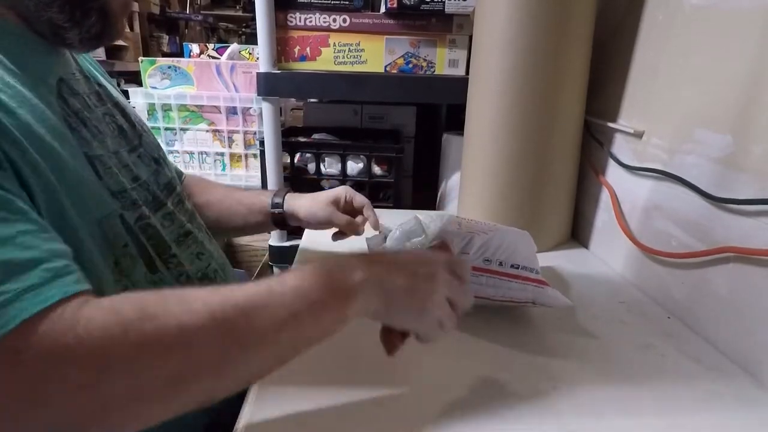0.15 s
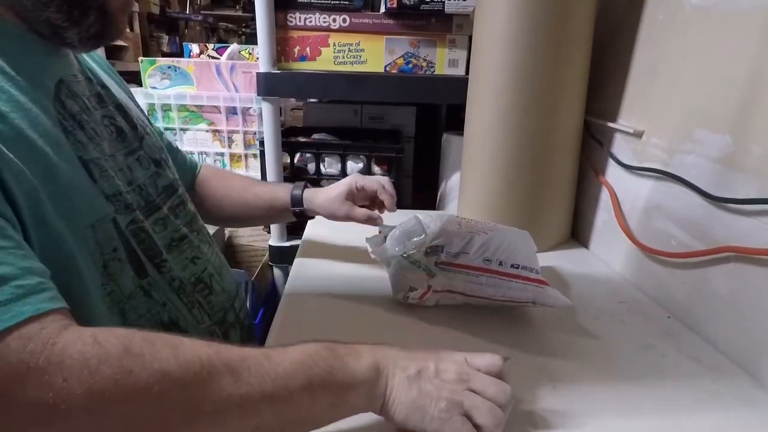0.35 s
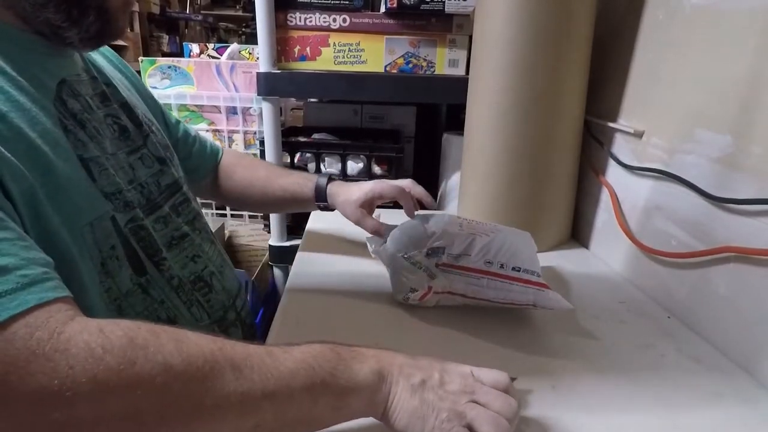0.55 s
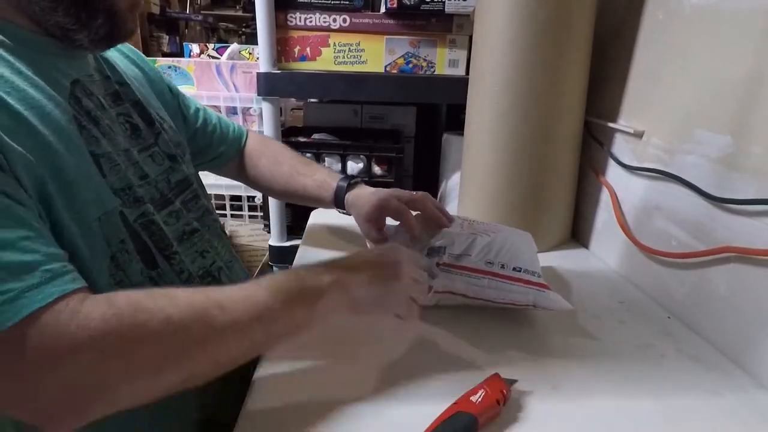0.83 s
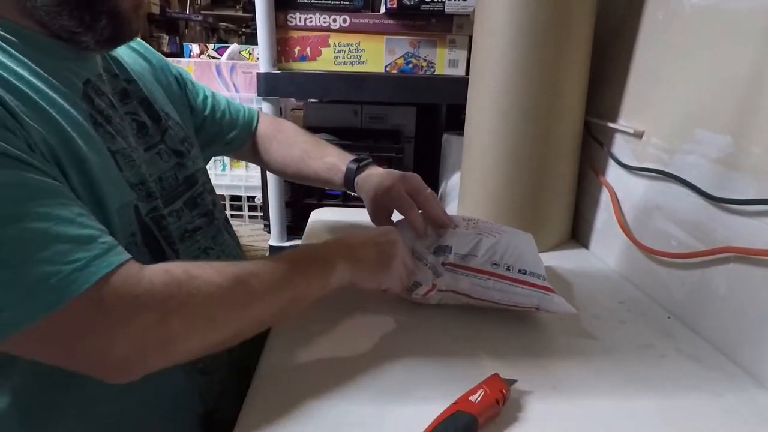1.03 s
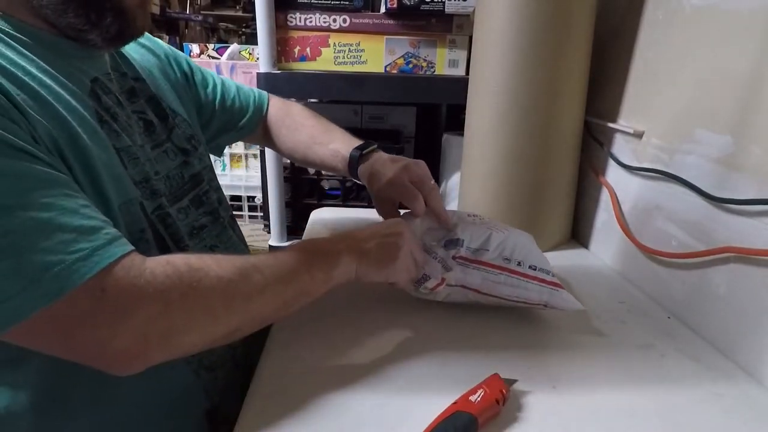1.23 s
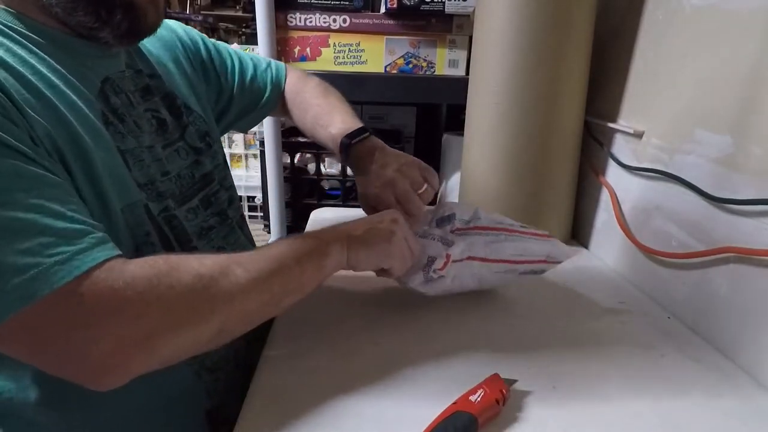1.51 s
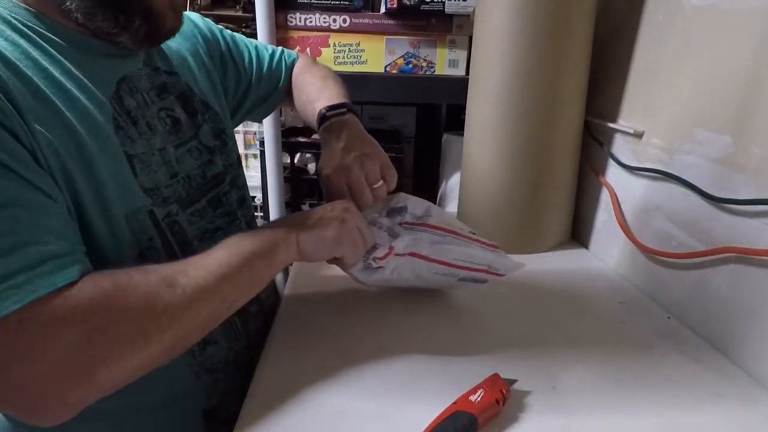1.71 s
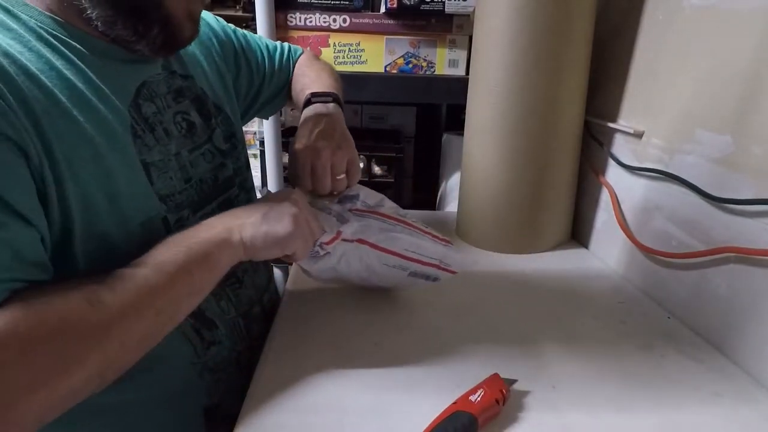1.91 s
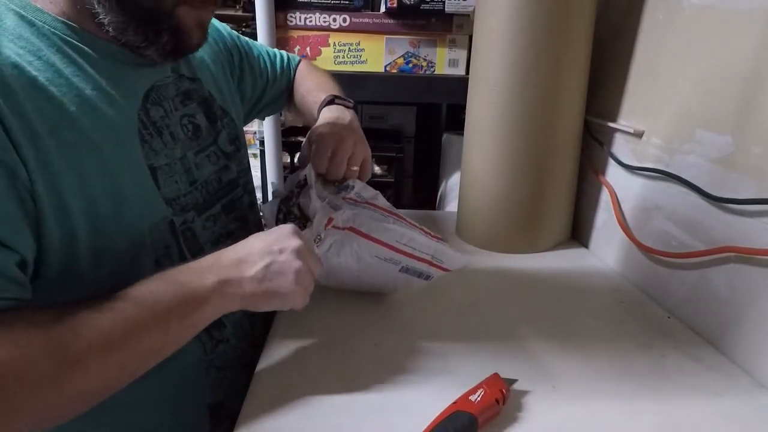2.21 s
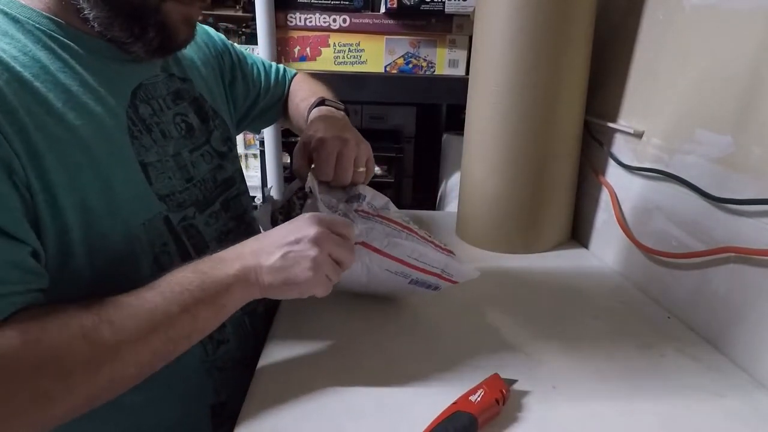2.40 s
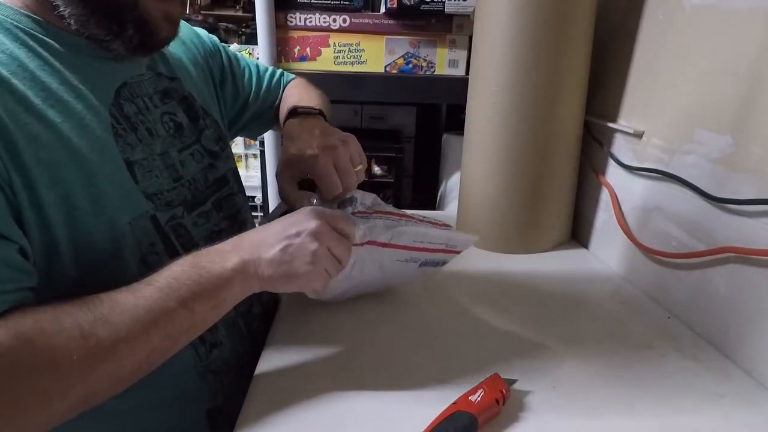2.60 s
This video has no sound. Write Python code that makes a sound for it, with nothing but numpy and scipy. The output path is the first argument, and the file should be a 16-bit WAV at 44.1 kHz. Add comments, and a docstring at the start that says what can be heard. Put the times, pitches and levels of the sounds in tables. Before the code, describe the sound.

Plastic bag rustling and crackling after dull bench thuds, then tearing open with a snap.

```python
"""A plastic mailer bag is pulled open by hand on a workbench in a small cluttered room.
A knife is set down and the bench thuds and sways; then the film is gripped and pulled.
Creases buckle in sharp crackles over a fine rustle, wide panels flip with hollow tocks and the bag
drags on the bench. The stretched plastic scrapes, rips and gives with a snap.
A low rumble and quiet room tone lie underneath."""
import sys
import numpy as np
from scipy import signal
from scipy.fft import rfft, irfft
from scipy.io import wavfile

SR = 44100
rng = np.random.default_rng(int(sys.argv[2]) if len(sys.argv) > 2 else 0)


def bounce(signal):
    """Save signal as a 16-bit WAV file at the path given by the first command-line argument."""
    frames = np.transpose(np.atleast_2d(signal))
    limited = np.clip(frames, -1, 1)
    pcm = np.round(limited * 32767).astype(np.int16)
    wavfile.write(sys.argv[1], SR, pcm)


N = 121275
TIME = np.arange(N) / SR
EVENT_TIME = TIME[:SR // 5]
IMPULSE = EVENT_TIME == 0


def from_db(db):
    """Decibels to gain."""
    return 10 ** (np.asarray(db) / 20)


def unit_rms(x):
    """Scale to rms 1."""
    return x / np.sqrt(np.mean(x ** 2) + 1e-20)


def unit_burst(x):
    """Scale a burst to the energy of 5 ms at rms 1."""
    return x * np.sqrt(0.005 * SR / (np.sum(x ** 2) + 1e-20))


def automation(rows):
    """One curve per value column, drawn through timed breakpoints."""
    times, *columns = np.transpose(rows)
    return [np.interp(TIME, times, column) for column in columns]


def add(out, start_s, x):
    """Mix x into out from start_s on."""
    i = max(int(start_s * SR), 0)
    out[i:i + len(x)] += x[:max(len(out) - i, 0)]


def eq(x, points, size=4096):
    """Minimum-phase EQ through (f/Hz, level/dB) points: no ringing ahead of an attack."""
    hz, db = np.transpose(points)
    grid = np.maximum(np.arange(size // 2 + 1) * SR / size, 1)
    gain = from_db(np.interp(np.log(grid), np.log(hz), db))
    cepstrum = irfft(np.log(gain))
    cepstrum[1:size // 2] *= 2
    cepstrum[size // 2 + 1:] = 0
    response = irfft(np.exp(rfft(cepstrum)))
    return signal.fftconvolve(x, response)[:len(x)]


def noise(colour):
    """Steady coloured noise at rms 1."""
    return unit_rms(eq(rng.standard_normal(N + SR // 4), colour, size=16384)[-N:])


def drift(rate_hz):
    """Smooth random modulation at rms 1."""
    r = np.exp(-2 * np.pi * rate_hz / SR)
    return unit_rms(signal.lfilter([1], [1, -2 * r, r * r], rng.standard_normal(N + SR))[SR:])


def resonance(x, hz, width_hz):
    """Two-pole resonator with unity gain at its peak."""
    r = np.exp(-np.pi * width_hz / SR)
    feedback = [1, -2 * r * np.cos(2 * np.pi * hz / SR), r * r]
    return signal.lfilter(np.array([1, 0, -1]) * (1 - r * r) / 2, feedback, x + 1e-18)


def burst(decay_s):
    """A run of tiny contacts: noise that starts at once and dies away."""
    return rng.standard_normal(len(EVENT_TIME)) * np.exp(-EVENT_TIME / decay_s)


def grains(per_s, spread_db=2):
    """Random clicks, mostly small, a few large."""
    sizes = from_db(spread_db * np.minimum(rng.exponential(1, N), 4.5)) * rng.choice([-1, 1], N)
    return sizes * (rng.random(N) < per_s / SR) / np.sqrt(per_s)


def room_tone():
    """A quiet, steady bed of dark noise."""
    # spectrum of the bed: f/Hz, relative level/dB
    colour = [(30, -2), (120, 0), (210, -1.5), (350, -5), (1400, -25.5), (2700, -24), (4200, -23.5),
              (6000, -27.5), (11000, -29), (15500, -41)]
    return from_db(-65) * noise(colour)


def rumble():
    """Deep noise that swells most just after the snap."""
    # rumble envelope: t/s, level/dB
    envelope = [(.14, -54), (.95, -52), (1.45, -59), (1.9, -60), (2.15, -46), (2.75, -57.5)]
    # sub-heavy spectrum: f/Hz, relative level/dB
    colour = [(20, 3), (34, 3.5), (55, -8), (90, -21), (250, -83)]
    return from_db(automation(envelope)[0]) * noise(colour)


def room_reverb(x):
    """Dense short reflections; the treble dies first."""
    low_t60_s, high_t60_s, predelay_s, crossover_hz = 0.32, 0.079, 0.00474, 4500
    t = TIME[:SR // 2]
    low_decay, high_decay = from_db(-60 * t / low_t60_s), from_db(-60 * t / high_t60_s)
    lowpass = signal.butter(2, crossover_hz, fs=SR, output="sos")
    highpass = signal.butter(2, crossover_hz, "high", fs=SR, output="sos")
    white = rng.standard_normal(len(t))
    low = signal.sosfilt(lowpass, white) * low_decay
    high = signal.sosfilt(highpass, rng.standard_normal(len(t))) * high_decay
    tail = (low + high) * (t > predelay_s) / np.linalg.norm(white * low_decay)
    return signal.fftconvolve(x, tail)[:N]


def drag():
    """The bag drags over the bench top with a low rub."""
    # friction envelope: t/s, level/dB
    envelope = [(.2, -72.5), (.95, -56), (1.3, -63.5), (1.45, -57), (1.6, -54), (1.72, -51), (1.93, -59),
                (2.07, -49.5), (2.22, -63.5), (2.75, -63.5)]
    # spectrum of the rub: f/Hz, relative level/dB
    colour = [(40, -16.5), (100, -11.5), (145, 2.5), (170, -7), (205, 0.5), (260, -10.5), (360, -20),
              (1000, -34)]
    return from_db(automation(envelope)[0]) * noise(colour)


def bench_knocks():
    """Each knock rings the top, rocks the whole bench slowly and adds a dull clack."""
    # hand and knife meet the bench: t/s, relative thud, sway and clack levels/dB, tilt/(dB per octave)
    knocks = [(.223, -39.5, -34.5, -51, 0), (.257, -38, -36, -53, 3.5), (0.289, -39, -31, -63, -8.5),
              (.398, -39, -41.5, -56.5, -1), (0.434, -37.5, -38.5, -64, -6),
              (0.518, -42, -39.5, -63, -14.5), (0.5455, -35.5, -55, -53, 2), (.579, -36.5, -50.5, -76, 5.5),
              (.619, -42.5, -60, -55.5, -8), (.668, -41, -47, -74, -4), (.724, -36.5, -54, -54, -0.5),
              (.760, -39.5, -66, -61, -2.5), (0.852, -44, -44, -58, 3.5), (.892, -44.5, -56, -56, 3),
              (.99, -54, -58, -71, -8.5)]
    # modes of the bench top: f/Hz, relative level/dB, t60/s
    modes = [(52.7, -12, 0.35), (78.2, -9, 0.31), (112.8, -4.5, 0.37), (142.2, -3, 0.28), (160.3, -2, 0.18),
             (193, 0.5, 0.18), (234.8, -3.5, 0.13), (312, -8.5, 0.092), (372, -19, 0.2)]
    # spectrum of the clack: f/Hz, relative level/dB
    clack_colour = [(150, -14), (300, 9.5), (520, 2), (700, 6), (1100, 0.5), (1500, -5.5), (2800, -11.5),
                    (4200, -12.5), (6000, -23.5), (15000, -31)]
    sway_hz, sway_rise_s, contact_s = 34.4, 0.03, 0.0059
    thud_trim_db, clack_trim_db, tick_db, scatter_db, pivot_hz = -0.5, 7, 19.5, 1.6, 160
    out, t = np.zeros(N), TIME[:SR]
    sway = np.sin(2 * np.pi * sway_hz * t) * t / sway_rise_s * np.exp(1 - t / sway_rise_s)
    attack = 1 - np.exp(-t / contact_s)
    for s, thud_db, sway_db, clack_db, tilt_db in knocks:
        thud = np.zeros(len(t))
        for hz, db, t60 in modes:
            struck_db = db + tilt_db * np.log2(hz / pivot_hz) + scatter_db * rng.normal()
            thud += from_db(struck_db - 60 * t / t60) * rng.choice([-1, 1]) * np.sin(2 * np.pi * hz * t)
        clack = eq(burst(decay_s=0.035) + from_db(tick_db) * IMPULSE, clack_colour)
        add(out, s, from_db(thud_trim_db + thud_db) * thud * attack + from_db(sway_db) * sway)
        add(out, s, from_db(clack_trim_db + clack_db) * unit_burst(clack))
    return out


def rustle():
    """Tiny wrinkles flip in clumps, faster under strain; layers of film slide on each other."""
    # strain on the bag, as its two sounds: t/s, relative slide level/dB, relative crinkle level/dB
    pull = [(0, -64, -70.5), (0.7, -96, -79.5), (0.8, -85, -60), (0.95, -54, -54), (1.04, -58.5, -59.5),
            (1.23, -56, -53.5), (1.3, -55.5, -59), (1.39, -57, -56), (1.54, -47.5, -46), (1.69, -51, -55.5),
            (1.75, -52, -48), (1.88, -49, -50), (1.97, -49, -47.5), (2.05, -40.5, -41.5),
            (2.092, -44.5, -47.5), (2.135, -62, -53.5), (2.32, -56.5, -51), (2.41, -55, -55),
            (2.74, -54.5, -53.5)]
    # bright spectrum of the wrinkles: f/Hz, relative level/dB
    crinkle_colour = [(200, -21), (900, -8), (1700, 1.5), (2800, -1.5), (3600, 0), (4600, 3.5),
                      (5700, -9.5), (7300, -9.5), (9000, -7), (10900, -9.5), (12200, -28), (15500, -45)]
    # softer spectrum of sliding film: f/Hz, relative level/dB
    slide_colour = [(100, -28), (220, -18), (350, -8.5), (560, 1.5), (800, 0.5), (1250, -3), (1650, -6),
                    (2300, -5.5), (6000, -15)]
    crinkle_trim_db, slide_trim_db, dry_tick_db, clump_db = -1, -2.5, 5, 1.5
    slide_db, crinkle_db = automation(pull)
    clumps = from_db(clump_db * drift(rate_hz=57))
    density = from_db(0.7 * (crinkle_db - np.median(crinkle_db)))
    ticks = grains(per_s=2000 * density, spread_db=3)
    pitches_hz = np.geomspace(1000, 14000, 12)
    pitch_index = rng.integers(0, len(pitches_hz), N)   # each wrinkle rings at one of these pitches
    rings = sum(resonance(ticks * (pitch_index == k), hz, hz * 0.21) for k, hz in enumerate(pitches_hz))
    wrinkles = unit_rms(rings) + from_db(dry_tick_db) * unit_rms(ticks)
    crinkle = unit_rms(eq(wrinkles, crinkle_colour) * clumps)
    slide = unit_rms(eq(grains(per_s=3000), slide_colour) * clumps)
    return from_db(crinkle_trim_db + crinkle_db) * crinkle + from_db(slide_trim_db + slide_db) * slide


def stretch():
    """Quick slips of the taut film excite one broad resonance: a hollow, rising scrape."""
    # glide of the resonance: t/s, f/Hz, level/dB
    glide = [(1.42, 865, -92), (1.54, 910, -56), (1.64, 1140, -52), (1.73, 1190, -59.5), (1.86, 1110, -60),
             (1.96, 1110, -83)]
    width_hz = 570
    hz, db = automation(glide)
    carrier = np.exp(2j * np.pi * np.cumsum(hz) / SR)
    r = np.exp(-np.pi * width_hz / SR)
    # shift down, low-pass, shift back up: a band-pass that follows the glide
    slips = signal.lfilter([1], [1, -2 * r, r * r], grains(per_s=750) / carrier + 1e-18)
    return from_db(db) * unit_rms((carrier * slips).real)


def panel_flips():
    """A wide panel of the bag flips over with a hollow tock of a few cycles."""
    # tocks: t/s, f/Hz, level/dB
    flips = [(0.0845, 643, -55), (0.868, 770, -57), (0.918, 650, -49), (1.0325, 810, -51),
             (1.0895, 800, -47.5), (1.178, 840, -55), (1.2043, 900, -49), (1.219, 755, -54.5),
             (1.5346, 870, -48), (2.016, 676, -39), (2.596, 860, -52)]
    out, rise_s = np.zeros(N), 0.00068
    envelope = EVENT_TIME * np.exp(-EVENT_TIME / rise_s)
    for s, hz, db in flips:
        add(out, s, from_db(db) * unit_burst(np.sin(2 * np.pi * hz * EVENT_TIME) * envelope))
    return out


def flutter(per_s):
    """Smaller wrinkles follow a crack in a ragged, dying cluster of ticks."""
    return burst(decay_s=0.0076) * (rng.random(len(EVENT_TIME)) < per_s / SR)


def crackles():
    """A crease buckles: a bright crack, a few cycles of ring, a little body."""
    # single creases: t/s, ring f/Hz, relative ring level/dB, relative treble level/dB
    creases = [(0.0573, 4520, -62, -62.5), (0.0833, 4240, -52, -59), (0.451, 4150, -53, -64),
               (0.5017, 3970, -60, -70), (0.6225, 2850, -59.5, -76), (0.7237, 4030, -60.5, -63),
               (0.779, 4230, -54.5, -55.5), (0.8156, 4230, -52.5, -61), (0.858, 4130, -55, -69),
               (0.9207, 3130, -39.5, -49), (0.931, 2980, -46.5, -58), (1.0062, 3600, -46.5, -61),
               (1.0893, 3400, -50.5, -53), (1.1048, 3150, -52, -55), (1.1263, 2930, -45.5, -57),
               (1.149, 3430, -50, -68), (1.218, 3400, -39.5, -49), (1.2382, 3500, -48.5, -61),
               (1.2729, 4200, -47, -62), (1.3307, 4200, -48.5, -70), (1.3545, 4130, -39.5, -48),
               (1.4115, 3800, -52, -53), (1.4186, 4200, -45.5, -53), (1.4438, 3830, -45, -49.5),
               (1.527, 4820, -45, -46.5), (1.5309, 4970, -40, -58), (1.5353, 4150, -46, -44.5),
               (1.5944, 4130, -45, -54), (1.619, 4000, -48, -58), (1.718, 2650, -38.5, -50),
               (1.885, 3000, -49, -66), (1.912, 3970, -43, -60), (1.9486, 4300, -42.5, -50),
               (1.9947, 4100, -43, -47.5), (2.0016, 3080, -40, -53), (2.016, 4300, -33, -39.5),
               (2.161, 3600, -53, -54), (2.1989, 3800, -43, -51), (2.2341, 4300, -48, -54),
               (2.2583, 3300, -53, -57), (2.2821, 4060, -45.5, -54), (2.465, 4200, -46, -60),
               (2.4813, 4840, -51.5, -49), (2.508, 4300, -52, -55.5), (2.5609, 2800, -53, -56),
               (2.586, 2850, -51.5, -61), (2.676, 2980, -49, -66), (2.7301, 4550, -44, -54),
               (2.74, 3800, -53, -66)]
    # EQ on the ring: f/Hz, relative level/dB
    ring_colour = [(300, -20), (1500, 1), (3200, 0), (4700, 1), (5700, -10), (11000, -16), (15000, -28)]
    # top end of the crack: f/Hz, relative level/dB
    treble_colour = [(1500, -30), (4500, -7), (5800, 0), (7500, -1), (10700, 0), (12200, -9), (15000, -11)]
    # midrange body: f/Hz, relative level/dB
    body_colour = [(100, -18), (300, -8), (650, 0), (1100, 0), (1700, -3), (2600, -17), (8000, -45)]
    click_db, flutter_db, treble_trim_db, body_db = 10, 7.5, 1.5, -6.5
    out = np.zeros(N)
    for s, hz, ring_db, treble_db in creases:
        crack = from_db(click_db) * IMPULSE + burst(decay_s=0.00092)
        crack += from_db(flutter_db) * flutter(per_s=900)
        width_hz = 1700 * (4000 / hz) ** 2   # long, low creases sound dry; short ones ring clean
        ring = resonance(resonance(crack, hz, width_hz), hz, width_hz)
        add(out, s, from_db(ring_db) * unit_burst(eq(ring, ring_colour)))
        add(out, s, from_db(treble_trim_db + treble_db) * unit_burst(eq(crack, treble_colour)))
        add(out, s, from_db(body_db + ring_db) * unit_burst(eq(burst(decay_s=0.004), body_colour)))
    return out


def rip():
    """Strands of plastic part in a rasping run that swells and stops short."""
    # spectrum of the tear: f/Hz, relative level/dB
    colour = [(150, -22), (550, 8), (1400, -3.5), (2000, 0), (4600, -1), (5800, -6.5), (10500, -10),
              (15500, -31)]
    start_s, end_s, release_s = 1.975, 2.074, 0.0045
    start_db, swell_db, rasp_db = -49, 10, 2
    progress = np.clip((TIME - start_s) / (end_s - start_s), 0, 1)
    swell = from_db(start_db + swell_db * progress) * (TIME > start_s)
    release = np.exp(-np.maximum(TIME - end_s, 0) / release_s)
    rasp = from_db(rasp_db * drift(rate_hz=120))
    strands = eq(grains(per_s=2500), colour)
    return swell * release * unit_rms(rasp * strands)


def snap():
    """The taut film lets go: one round push-pull of air, thrown back by a wall; the slack bag rattles."""
    # the film gives way: t/s, pop level/dB
    snaps = [(2.0661, -23.5)]
    # spectrum of the rattle: f/Hz, relative level/dB
    rattle_colour = [(50, -26), (130, 0), (270, -13), (470, 4.5), (800, -5), (1200, 2.5), (1600, 4),
                     (2000, -7.5), (2500, 0), (4300, -3.5), (5700, -16), (10500, -26), (15500, -39)]
    period_s, rattle_db, wall_delay_s, wall_db = 0.0014, -1, 0.00917, -13
    out, cycles = np.zeros(N), EVENT_TIME / period_s
    pop = unit_burst(np.sin(2 * np.pi * cycles) * cycles ** 2 * np.exp(-cycles / 0.28))
    rattle_attack = 1 - np.exp(-2 * cycles)
    for s, db in snaps:
        rattle = unit_burst(eq(burst(decay_s=0.0056) * rattle_attack, rattle_colour))
        add(out, s, from_db(db) * (pop + from_db(rattle_db) * rattle))
        add(out, s + wall_delay_s, from_db(db + wall_db) * pop)
    return out


def scene():
    """Mono mix: the bag with its reverb, over the dry bench and the background."""
    bag = rustle() + stretch() + rip() + crackles() + panel_flips() + snap()
    low_end = drag() + rumble()
    reverb = from_db(-10.5) * room_reverb(bag)
    return (bag + reverb + bench_knocks() + low_end + room_tone())[None]


def record(dry):
    """A steep low-pass takes off the very top."""
    cutoff_hz = 15450
    return signal.sosfilt(signal.ellip(10, .3, 70, cutoff_hz, fs=SR, output="sos"), dry)


dry = scene()
out = record(dry)
bounce(out)
```